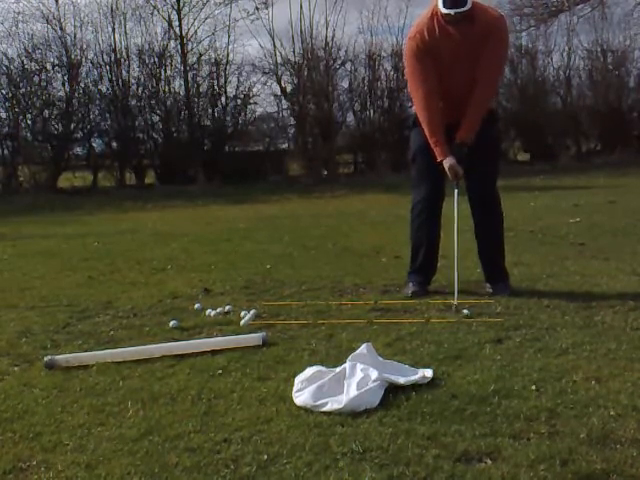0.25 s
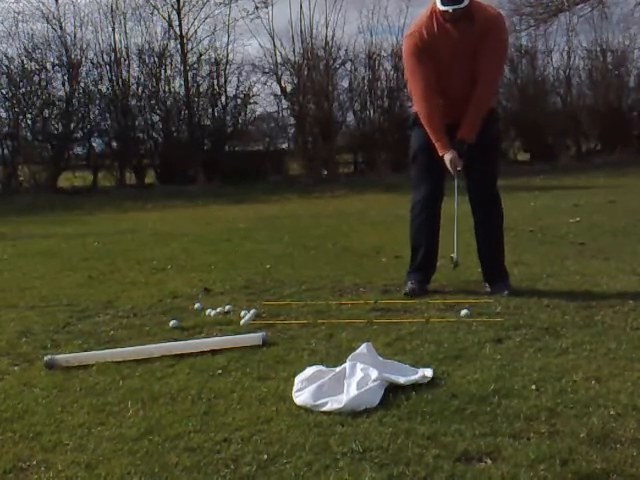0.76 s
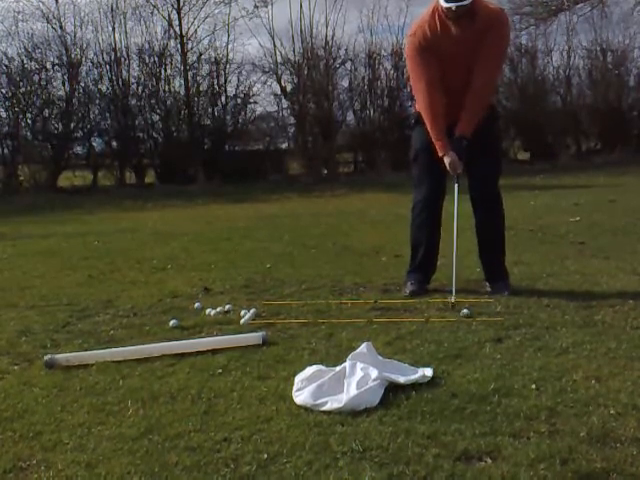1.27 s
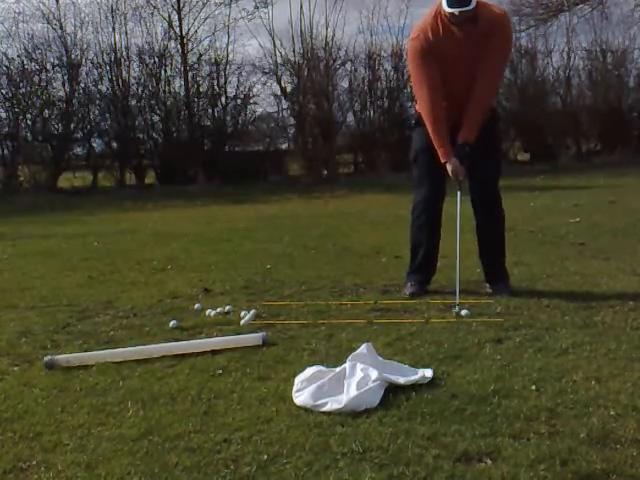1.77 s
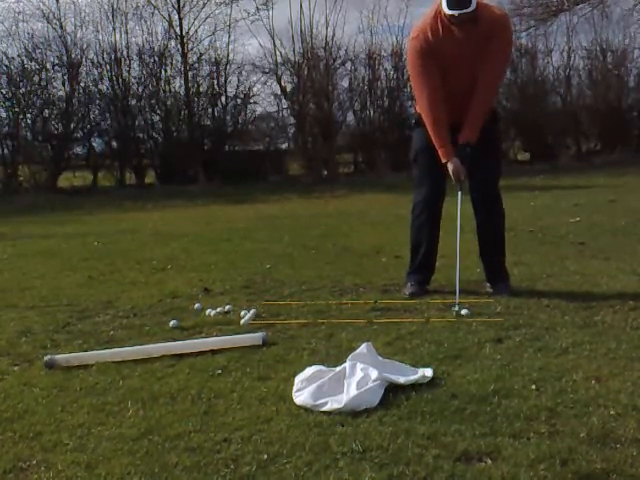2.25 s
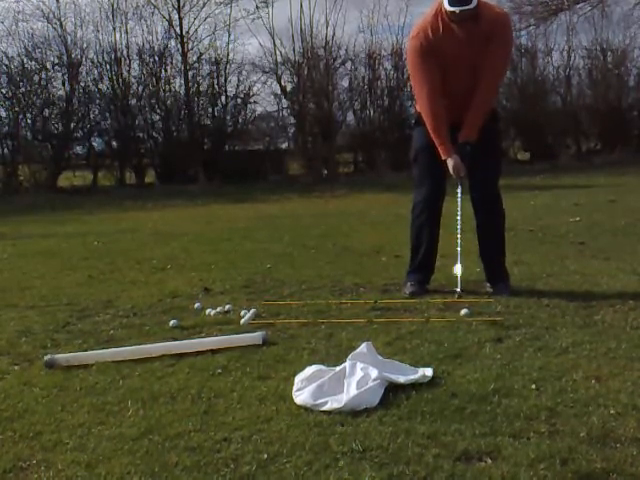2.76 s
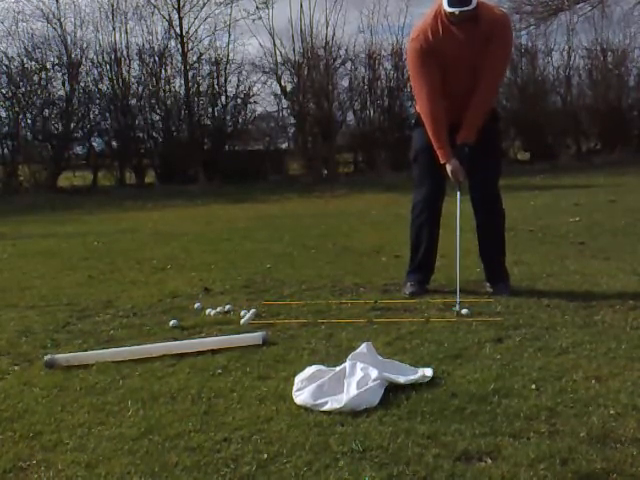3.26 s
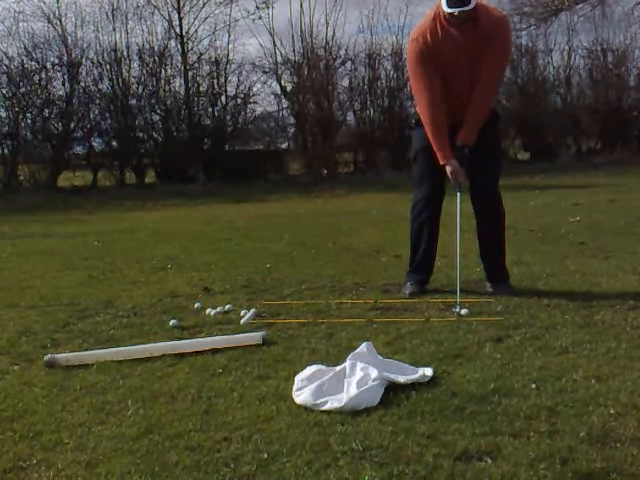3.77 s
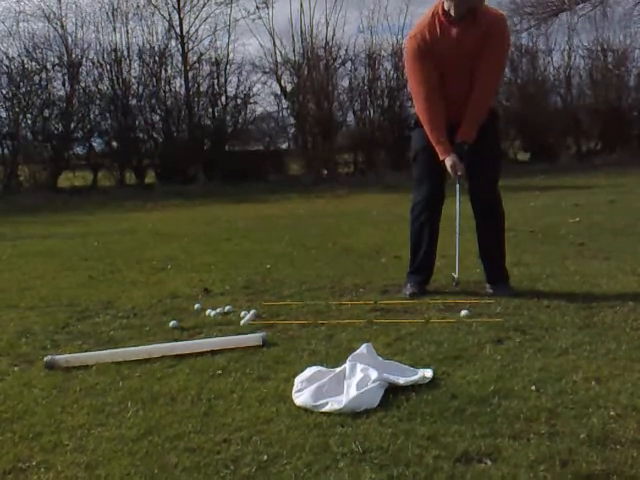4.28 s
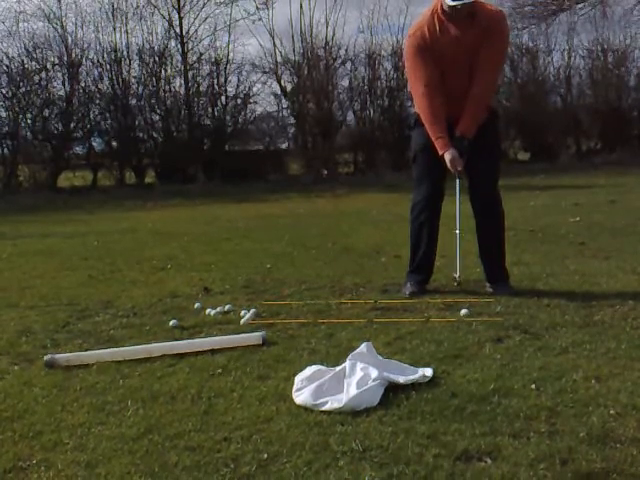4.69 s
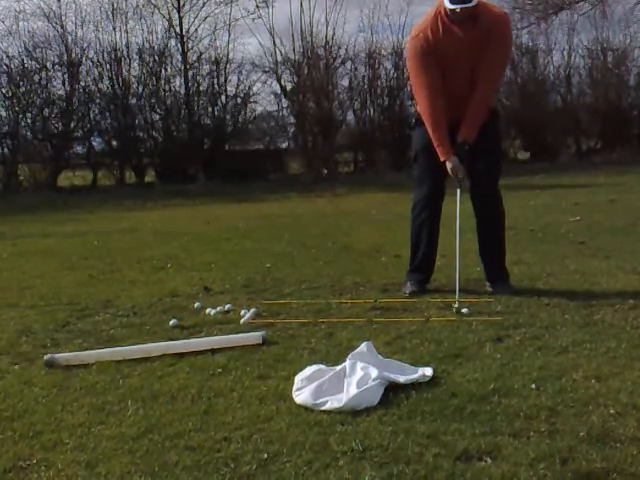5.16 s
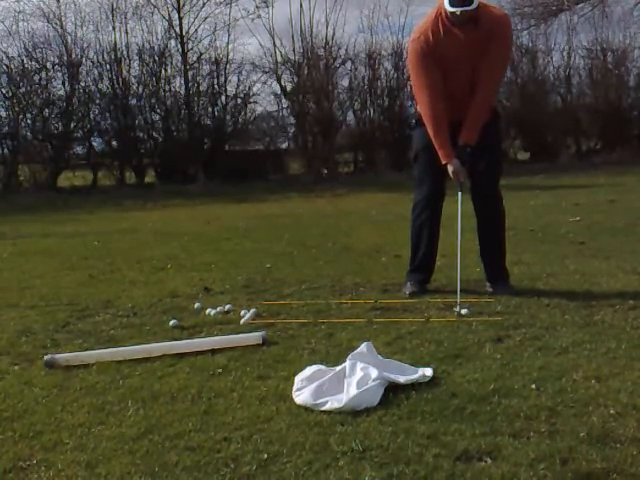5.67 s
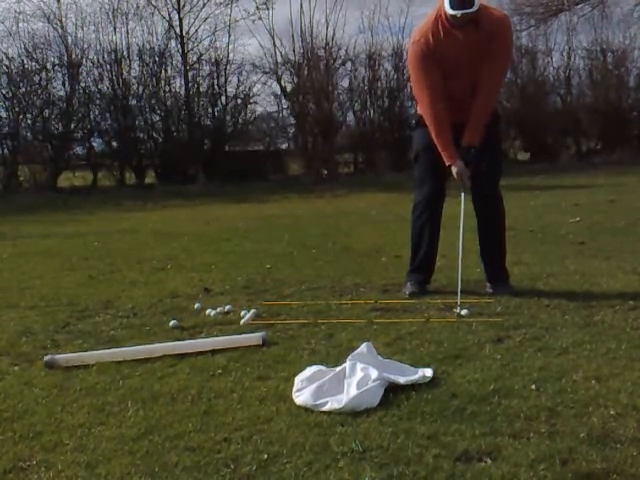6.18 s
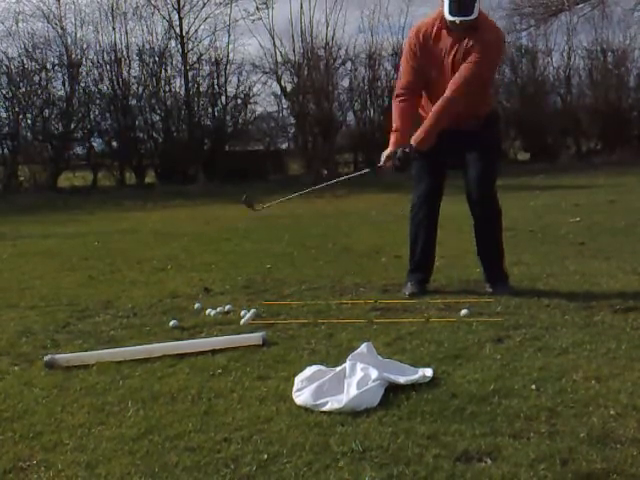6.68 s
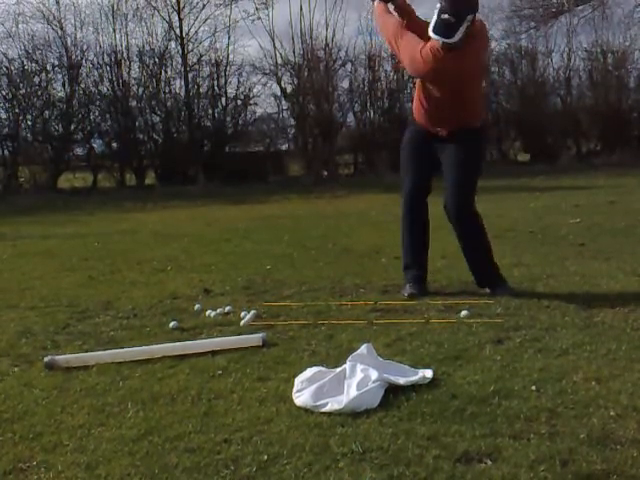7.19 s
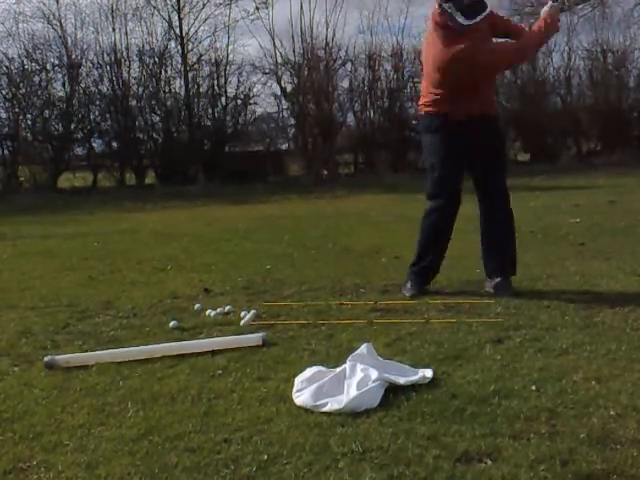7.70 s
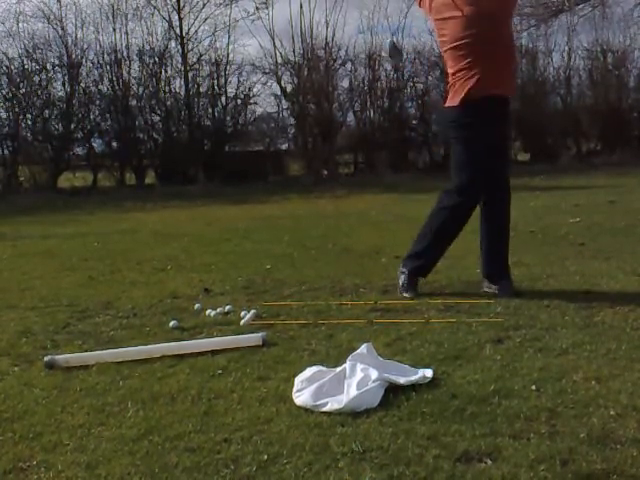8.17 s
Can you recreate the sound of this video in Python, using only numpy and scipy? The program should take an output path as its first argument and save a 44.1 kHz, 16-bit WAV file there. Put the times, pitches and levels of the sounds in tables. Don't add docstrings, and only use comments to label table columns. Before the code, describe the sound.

Low humming aircraft drone and soft wind rumble outdoors, a dull wind thump midway, and near the end a quick swish and crisp golf strike.

```python
import sys
import numpy as np
from scipy import signal
from scipy.io import wavfile
from scipy.ndimage import uniform_filter1d

SR = 44100
rng = np.random.default_rng(int(sys.argv[2]) if len(sys.argv) > 2 else 0)


def volts_from_db(level):
    exponent = np.asarray(level, float) / 20
    return 10 ** exponent


def unload_audio(sound):
    columns = np.transpose(np.atleast_2d(sound))
    steps = np.round(np.clip(columns, -1, 1) * 32767)
    wavfile.write(sys.argv[1], SR, steps.astype(np.int16))


N = 372194
T = np.arange(N) / SR


def read(table):
    s, value = np.transpose(table)
    return np.interp(T, s, value)


def band(lo_hz, hi_hz, order=2, size=N):
    sos = signal.butter(order, [lo_hz, hi_hz], "band", fs=SR, output="sos")
    noise = signal.sosfilt(sos, rng.standard_normal(size))
    return noise / noise.std()


def walk(rate):
    k = int(SR / rate)
    steps = np.repeat(rng.standard_normal(N // k + 1), k)
    return 1.29 * uniform_filter1d(uniform_filter1d(steps, k), k)[:N]


def swell(s, length):
    return np.exp(-2 * ((T - s) / length) ** 2)


def arch(s, hold_s, rise, fall):
    return np.minimum(rise * (T - s), 0) - fall * np.maximum(T - s - hold_s, 0)


def add(out, s, sound):
    i = int(s * SR) - len(sound) // 2
    part = out[max(i, 0):i + len(sound)]
    part += sound[max(-i, 0):][:len(part)]


def puffs(rows, spread, grit_db, attack):
    out = np.zeros(N)
    t = T[:SR // 2] - .25
    for s, length, hz, db in rows:
        envelope = np.exp(-2 * (t / length / np.where(t < 0, attack, 1)) ** 2)
        add(out, s, volts_from_db(db) * envelope * band(hz / spread, hz * spread, order=3, size=SR // 2))
    return out * volts_from_db(grit_db * walk(200))


def ring(start, modes, rise):
    t = np.maximum(T[-SR:] - start, 0)
    y = 0
    for hz, db, t60 in modes:
        y = y + volts_from_db(db) * np.sin(2 * np.pi * hz * t) * np.exp(-np.log(1000) * t / t60)
    return np.pad(y * (1 - np.exp(-t / rise)), (N - SR, 0))


# (f/Hz, level/dB per Hz)
AIR_SPECTRUM = [(59, -29), (100, 1), (129, -9), (170, -25), (206, -25), (249, -16.5), (373, -19),
                (433, -21.5), (752, -29), (3620, -48.5), (10000, -55), (15000, -48.5), (16000, -58)]


def air():
    hz, db = np.transpose(AIR_SPECTRUM)
    out, drift = 0, walk(0.47)
    for f in 130 * 2 ** np.arange(0, 7, .5):
        far = 1 / (1 + f / 2500)
        density_db = np.interp(np.log(f), np.log(hz), db)
        gain_db = density_db + 10 * np.log10(f) + far * (1.7 * drift + 1.3 * walk(9))
        out = out + volts_from_db(gain_db) * band(f / 2 ** 0.31, f * 2 ** 0.21)
    twigs = volts_from_db(-80.5 + .5 * drift) * band(2400, 3100)
    return volts_from_db(-50) * out / out.std() + twigs


# (t/s, length/s, f/Hz, level/dB)
RUSTLES = [
    (.645, .012, 3200, -66),
    (1.76, .01, 3500, -69),
]


def rustles():
    return puffs(RUSTLES, spread=1.3, grit_db=1.5, attack=.4)


# (t/s, length/s, rumble level/dB, buffet level re rumble/dB)
WIND = [(0, 0.12, -38, -8), (0.295, 0.41, -41, -10), (.59, .12, -44, 0), (0.89, 0.44, -44, -7),
        (1.19, 0.074, -50, -3), (1.407, .1, -38, -12), (1.63, 0.076, -41, -3), (2.105, .4, -49, -6),
        (2.53, .1, -52, 0), (2.703, .07, -45, -5), (2.9, .2, -54, -3), (3.57, .08, -43, -3),
        (3.7, 0.17, -52, 0), (4.01, 0.088, -44, -8), (4.462, 0.15, -40, -3), (4.642, 0.17, -37, -4),
        (4.942, 0.11, -40, -8), (5.102, 0.22, -45, 0), (5.45, 0.62, -54, 3), (6.154, .1, -48, -5),
        (6.3, 0.12, -52, 5), (6.503, 0.15, -49, -3), (6.96, 0.17, -47, -10), (7.24, 0.4, -38, -6),
        (7.55, 0.29, -40, -3), (7.85, 0.2, -41, -3), (8.01, 0.07, -35, -12), (8.13, .06, -39, -8),
        (8.42, 0.27, -39, -7)]


def wind():
    rumble = volts_from_db(-57 + 3 * walk(10))
    buffet = volts_from_db(-53 + 3 * walk(8.7))
    for s, length, db, share_db in WIND:
        puff = swell(s, 0.53 * length)
        rumble += volts_from_db(db) * puff
        buffet += volts_from_db(db + share_db) * puff
    eddies = rumble * band(27, 72.4) + buffet * band(55, 185, order=3)
    return volts_from_db(2 * walk(25)) * eddies + volts_from_db(-55.0) * band(45, 130)


# (low f/Hz, high f/Hz, top level/dB, steepness)
GUST = [
    (32, 66, -25, 1.0),
    (70, 163, -23.5, 1.1),
    (170, 335, -25, 1.5),
    (323, 620, -36, 2.6),
]


def gust():
    gust_db = arch(4.165, hold_s=0.039, rise=270, fall=95)
    lump_db = 2 * walk(25)
    out = 0
    for lo_hz, hi_hz, top_db, steep in GUST:
        out = out + volts_from_db(top_db + steep * gust_db + lump_db) * band(lo_hz, hi_hz, order=4)
    return out


# (t/s, f/Hz, level/dB)
SLAPS = [(4.124, 110, -19.5), (4.154, 139, -21), (4.168, 170, -7.5), (4.177, 151, -15.5),
         (4.184, 140, -16.5), (4.198, 163, -4.5), (4.206, 232, -15), (4.216, 94.5, -11), (4.233, 190, -17),
         (4.247, 141, -14.5), (4.257, 129.5, -13.5), (4.269, 91, -16.5), (4.284, 120, -19),
         (4.297, 70, -19), (4.315, 101, -21), (7.175, 91, -19.5), (7.235, 81, -19.5), (7.551, 70, -25.5),
         (7.621, 75, -24.5), (8.011, 64.3, -27)]


def slaps():
    out = np.zeros(N)
    snaps = [(s + 0.00304, 3.3 * hz, db - 20) for s, hz, db in SLAPS]
    for s, hz, db in SLAPS + snaps:
        u = (T[:8000] - 4000 / SR) * hz - .5
        add(out, s, -volts_from_db(db) * np.sin(2 * np.pi * u) * np.exp(-(u / 0.53) ** 2))
    return out


# (t/s, f/Hz)
BLADE_RATE = [(0, 84.3), (1, 83.6), (3, 82.15), (5, 80.7), (8.44, 78.4)]


def blade_phase():
    hz = read(BLADE_RATE)
    return 2 * np.pi * np.cumsum(hz * (1 + .001 * walk(5))) / SR


# (t/s, level/dB)
BLADE_LEVEL = [(0, -30.5), (.3, -34), (1.2, -35.5), (1.8, -38.5), (2.4, -38.5), (2.7, -37), (3, -38.5),
               (3.9, -35.5), (4.5, -36.5), (4.8, -34), (5.1, -35.5), (6, -37), (6.6, -35.5), (7.2, -35.5),
               (7.5, -39.5), (8.1, -37.5), (8.44, -40.3)]
# (multiple, level/dB)
PARTIALS = [(2, -61.5), (3, -63), (4, -68), (5, -72), (6, -74)]
# (t/s, length/s, multiple,
# level/dB)
SWELLS = [(0, .6, 2, -49), (.9, 0.29, 2, -53), (1.5, 0.28, 2, -55.5), (2.6, 1.18, 2, -52),
          (4.953, 0.73, 2, -48), (6.3, 1.13, 2, -45.5), (7.5, 0.56, 2, -48), (8.299, 0.84, 2, -47.5),
          (1, 0.62, 3, -60.5), (2.407, 0.64, 3, -49.5), (3.3, 0.33, 3, -61), (4.4, .6, 3, -54.5),
          (7.803, .8, 3, -59.5), (.1, 0.56, 4, -50), (0.902, 0.34, 4, -52.5), (1.504, 0.24, 4, -58.5),
          (2.104, .3, 4, -57), (2.7, 0.39, 4, -58), (3.505, 0.53, 4, -54), (4.844, 0.84, 4, -49),
          (5.705, 0.26, 4, -56.5), (6.35, 0.59, 4, -61), (7.6, .4, 4, -60),
          (.3, 1, 6, -64), (1.7, 1.18, 5, -57), (2.28, 0.16, 5, -56), (2.44, 0.8, 6, -62),
             (3.64, .8, 5, -56), (3.87, 0.37, 6, -55), (5.05, 0.77, 5, -53), (5.1, 0.55, 6, -58.5),
             (6.1, 1.3, 6, -61), (6.7, 0.73, 5, -56), (5.98, 0.39, 7, -62), (2.6, 0.72, 7, -63.5),
             (2.6, .7, 9, -61), (2.43, 0.47, 8, -61), (3.93, .4, 8, -61), (4.0, 0.3, 9, -60),
             (8.6, 0.73, 5, -58.5), (1.7, 1.1, .5, -57)]


def blade_tone(phase):
    lines = {1: volts_from_db(read(BLADE_LEVEL))}
    steady = [(0, np.inf, k, db) for k, db in PARTIALS]
    for s, length, k, db in steady + SWELLS:
        lines[k] = lines.get(k, 0) + volts_from_db(db) * swell(s, length)
    tone = 0
    for k, gain in lines.items():
        tone = tone + np.sqrt(2) * gain * volts_from_db(.8 * walk(6)) * np.sin(k * phase - 0.88 * k)
    return tone


# (t/s, level/dB)
ROAR = [(0, -54.5), (.25, -53.5), (1.05, -63), (1.28, -57), (1.4, -61), (1.9, -62), (2.18, -54.5),
        (2.5, -51), (3.15, -57.5), (3.7, -60), (3.8, -53), (4.75, -56.5), (5.24, -56), (5.6, -65),
        (6.4, -54.5), (6.6, -61.5), (7.7, -61.5), (8.2, -56.5)]


def roar(phase):
    depth_db = read(ROAR) + 58
    low = volts_from_db(-60.5 + 1.1 * depth_db + 2.5 * walk(12)) * band(372, 616)
    mid = volts_from_db(-61.5 + 0.87 * depth_db + 2.47 * walk(15)) * band(542, 913)
    high = volts_from_db(-67.5 + .4 * depth_db + 1.5 * walk(15)) * band(1000, 2060)
    return (low + mid + high) * (1 + .25 * np.sin(phase)) * volts_from_db(2.0 * walk(130))


# (t/s, length/s, f/Hz, level/dB)
CRACKLES = [(.31, 0.1, 1430, -60), (2.22, 0.15, 1200, -60), (2.26, .1, 1590, -65), (4.39, 0.03, 1050, -60),
            (4.525, .03, 1200, -58), (4.55, .09, 1500, -63), (4.655, .03, 1100, -61),
            (6.26, 0.057, 1300, -60), (6.84, 0.13, 1200, -61), (5.2, .25, 500, -54), (6.2, .3, 480, -56),
            (7.57, .025, 1000, -59), (8.12, .15, 500, -55), (7.572, .025, 1450, -60),
            (7.618, .014, 1530, -53), (7.67, .12, 1500, -57.5)]


def crackle(phase):
    beats = np.exp(1.5 * (np.cos(phase - 1.3) - 1))
    return 2 * beats * puffs(CRACKLES, spread=1.07, grit_db=2.0, attack=1)


def plane():
    phase = blade_phase()
    return blade_tone(phase) + roar(phase) + crackle(phase)


# (t/s, length/s, f/Hz, level/dB)
ECHOES = [(7.894, .012, 4800, -47), (7.905, .035, 3400, -57), (7.932, .025, 1500, -56),
          (7.965, .024, 4200, -55), (7.966, .05, 2750, -54.5), (7.966, .025, 6500, -72),
          (8.008, .045, 2500, -54.5), (8.086, .02, 3600, -68), (8.104, .006, 3000, -65),
          (8.118, .015, 2800, -65), (8.0, .3, 1700, -63), (7.98, .16, 3200, -70)]


def echoes():
    return puffs(ECHOES, spread=1.28, grit_db=2.5, attack=.3)


BALL_S, TURF_S = 7.8851, 7.8888


def swish():
    hz = np.maximum(610 + arch(BALL_S, 0, rise=2090, fall=3300), 0)
    tone_db = -30 + arch(BALL_S - .018, .015, rise=900, fall=800)
    hiss_slope_db = arch(BALL_S - .03, .04, rise=450, fall=340)
    tone_gain = np.sqrt(2) * volts_from_db(tone_db + 3.5 * walk(150))
    tone = tone_gain * np.sin(2 * np.pi * np.cumsum(hz * (1 + 0.0607 * walk(150))) / SR)
    hiss = band(740, 1700) + 0.6 * band(1500, 3660, order=3)
    hiss = hiss + .12 * volts_from_db(.6 * hiss_slope_db) * band(3800, 6300, order=3)
    return tone + volts_from_db(-44.5 + hiss_slope_db) * hiss


def spray():
    t = T - BALL_S - .0006
    after = t.clip(0)
    brush = .36 * np.exp(-(t / .0026) ** 4)
    torn = .7 * np.exp(-after / 0.0039) + 0.24 * np.exp(-after / 0.0053)
    burst = np.where(t > 0, torn, brush)
    bright = np.where(t > 0, burst ** 1.2, brush)
    return burst * volts_from_db(-20) * band(900, 6500) + bright * volts_from_db(-26.0) * band(8500, 14500)


# (f/Hz, level/dB, t60/s)
FACE = [(1125, -10.5, 0.018), (1700, 4, 0.0062), (2000, 4, 0.006), (2384, -12.5, 0.013), (3110, -4, 0.013),
        (3690, -10.5, 0.01), (4440, -12.5, 0.013), (5640, -6, 0.008), (6200, -8, .008),
        (11160, -16.5, 0.0073), (13100, -19, 0.0067)]
# (f/Hz, level/dB, t60/s)
TURF = [(500, -6, 0.014), (244, -21, 0.03), (330, -20, .025), (2380, -7, 0.01), (2800, -13.5, 0.013),
        (3250, -9, 0.011), (4300, -15, .012), (5400, -13, .01)]


def impact():
    return ring(BALL_S, FACE, rise=0.001) + ring(TURF_S, TURF, rise=0.00073)


def scene():
    background = air() + rustles() + wind() + gust() + slaps() + plane()
    stroke = echoes() + swish() + spray() + impact()
    return (background + stroke)[None]


def top_cut(x):
    return signal.sosfilt(signal.butter(12, 16480, fs=SR, output="sos"), x)


# (t/s, level/dB)
DUCK = [
    (4.15, 0),
    (4.3, 0.5),
    (4.45, -1),
    (4.6, -0.5),
]


def record(dry):
    hissy = (dry + volts_from_db(-73.5) * band(12800, 15900)) * volts_from_db(read(DUCK))
    low_pass = signal.ellip(10, .3, 60, 15750, fs=SR, output="sos")
    mix = signal.sosfilt(low_pass, hissy)
    return top_cut(mix)


dry = scene()
out = record(dry)
unload_audio(out)
```